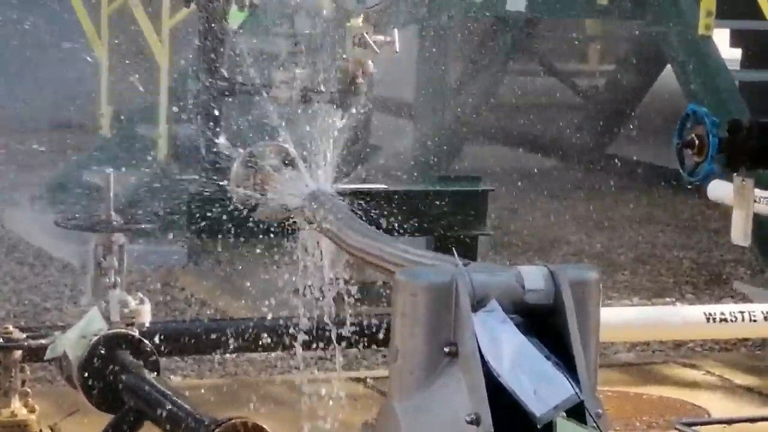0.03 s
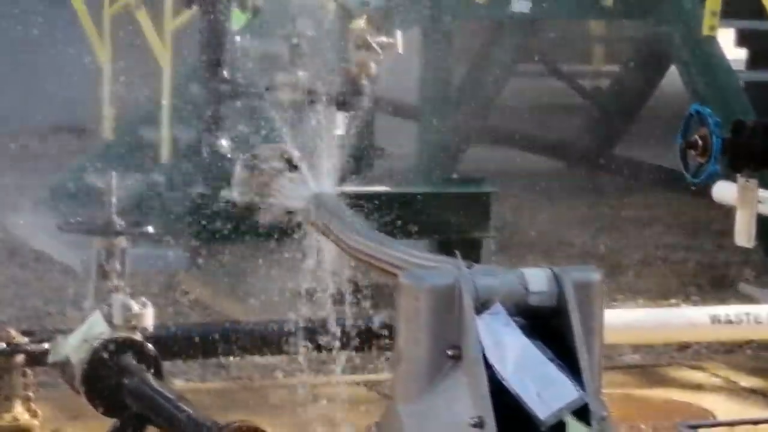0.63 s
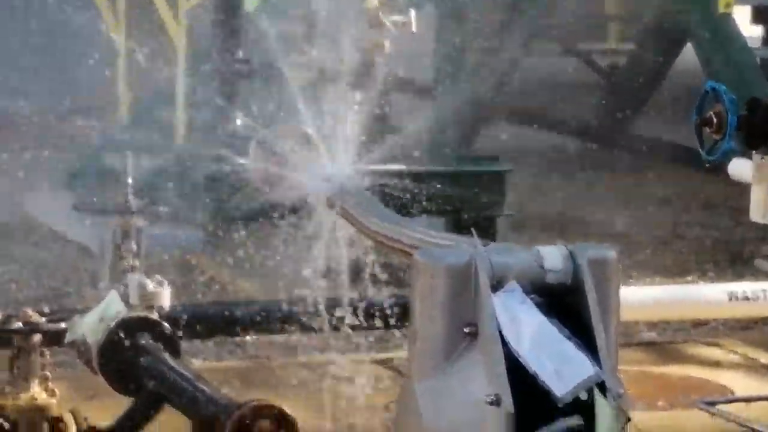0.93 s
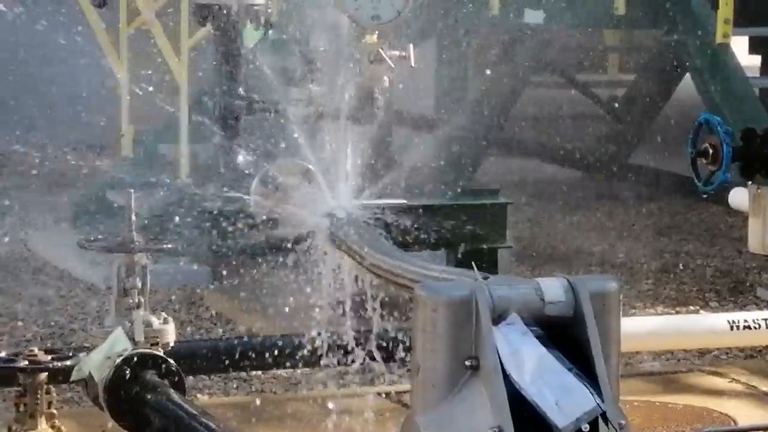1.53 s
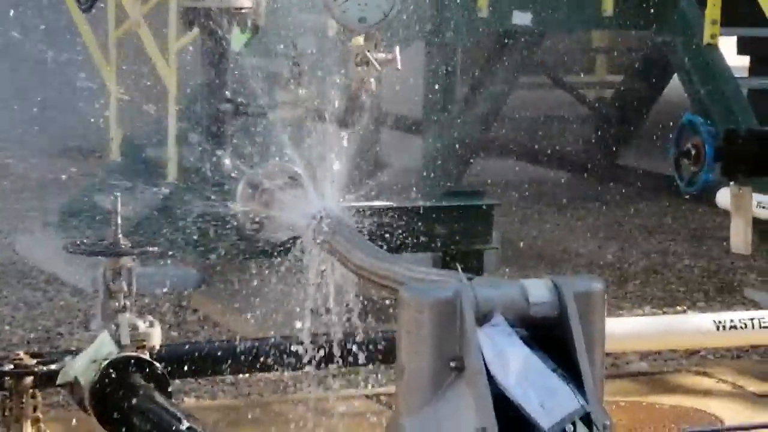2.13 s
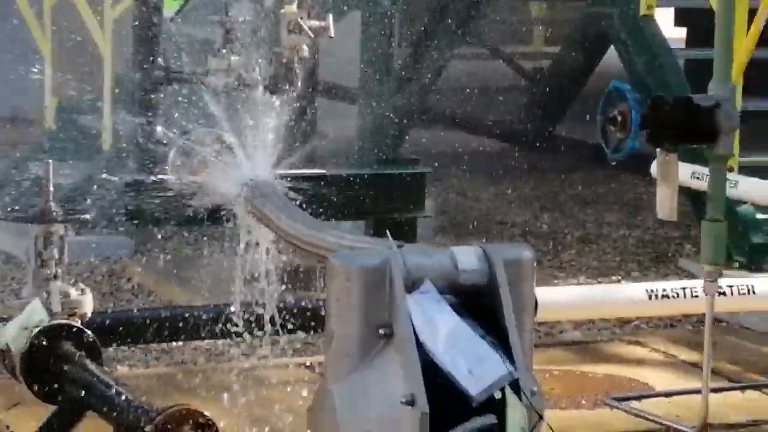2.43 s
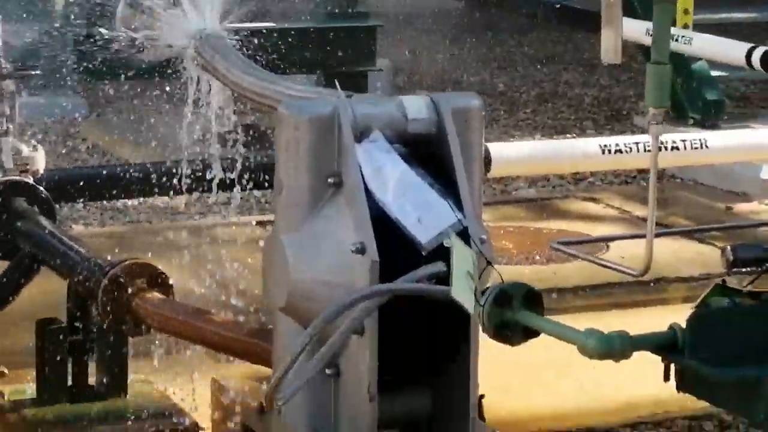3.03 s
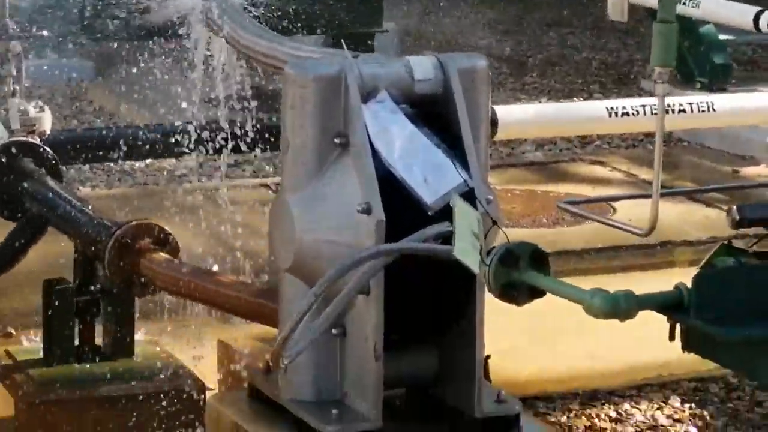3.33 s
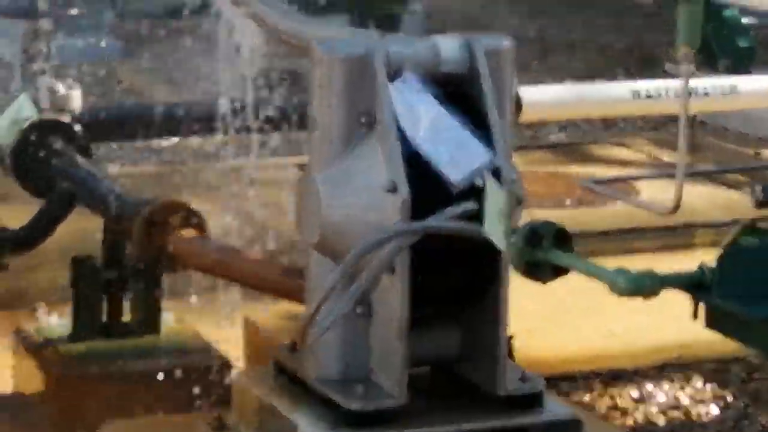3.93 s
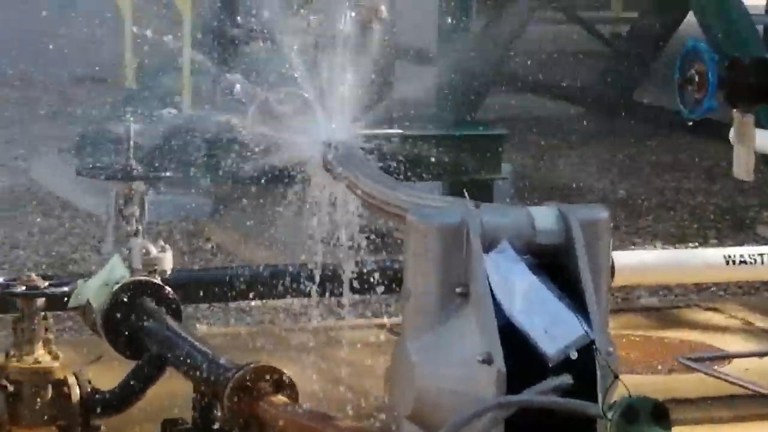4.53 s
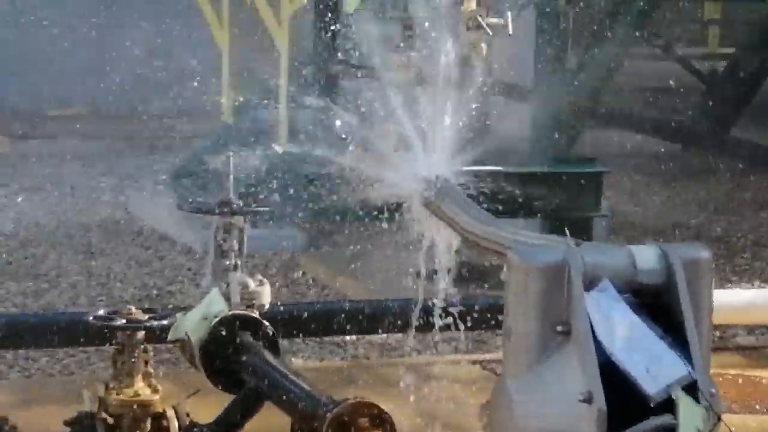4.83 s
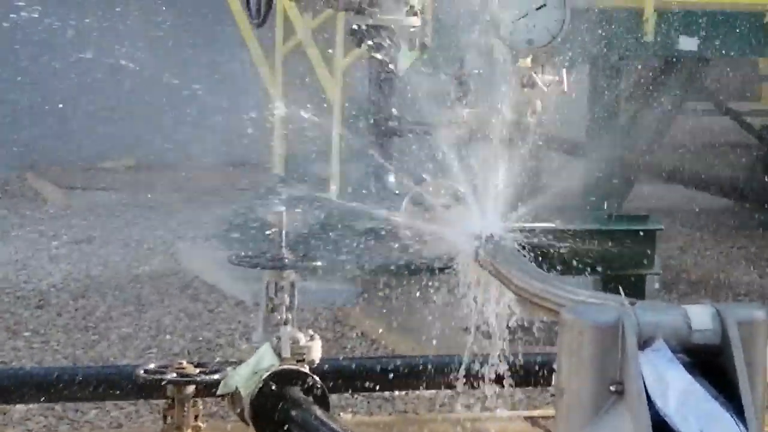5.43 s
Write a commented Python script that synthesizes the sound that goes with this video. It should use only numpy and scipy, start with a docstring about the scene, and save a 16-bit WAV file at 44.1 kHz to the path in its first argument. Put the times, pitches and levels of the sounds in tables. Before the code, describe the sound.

Water sprays and splutters from a leaking hose in time with rhythmic metallic pump clacks, under a piercing, wavering whine and wind rumble.

```python
"""A pump at an outdoor plant forces water out of a split hose, one stroke about every 0.58 s.
Each stroke clacks against the ringing pump head and drives a gush, then a splutter of bubbles, into the
steady spray. The motor drive whines at a pitch and its octave, rising and sagging with the load.
Drops splat on the machinery, wind buffets the right port of a hand-held microphone,
and other machines drone in the distance."""
import sys
import numpy as np
from scipy import signal
from scipy.fft import rfft, irfft
from scipy.io import wavfile

SR = 44100
rng = np.random.default_rng(int(sys.argv[2]) if len(sys.argv) > 2 else 0)


def master_out(mix):
    """Clip the mix to full scale and print it as 16-bit PCM to the path in sys.argv[1]."""
    frames = np.transpose(np.atleast_2d(mix))
    ceiling = np.clip(frames, -1, 1)
    pcm = np.round(ceiling * 32767).astype(np.int16)
    wavfile.write(sys.argv[1], SR, pcm)


N = 245637
TIME = np.arange(N) / SR


def undb(db):
    """Decibels to gain."""
    return 10 ** (np.asarray(db) / 20)


def unit(x):
    """Scale to rms 1."""
    return x / np.sqrt(np.mean(x ** 2))


def ramp(x):
    """Smooth step from 0 to 1."""
    return np.sin(np.pi / 2 * np.clip(x, 0, 1)) ** 2


def curves(table):
    """Automation lanes: each column of a table, joined by straight lines in time."""
    times, *columns = np.transpose(table)
    return [np.interp(TIME, times, column) for column in columns]


def response(hz, eq, column=1):
    """Gain of an EQ table at the given frequencies."""
    eq = np.asarray(eq, float)
    return undb(np.interp(np.log(hz + 1e-3), np.log(eq[:, 0]), eq[:, column]))


def colour(x, eq, column=1):
    """Filter by an EQ table."""
    return irfft(rfft(x) * response(np.fft.rfftfreq(N, 1 / SR), eq, column), N)


def walk(rate_hz):
    """Smooth random modulation with rms 1."""
    hz = np.fft.rfftfreq(N, 1 / SR)
    return unit(irfft(rfft(rng.standard_normal(N)) * np.exp(-(hz / rate_hz) ** 2), N))


def sides(pan_db):
    """Left and right gains with mean power 1; pan is left minus right."""
    gains = undb(np.array([pan_db, -pan_db]) / 2).reshape(2, -1)
    return gains / np.sqrt(np.mean(gains ** 2, axis=0))


def add(out, start_s, x):
    """Mix in a one-shot."""
    i = int(start_s * SR)
    x = x[..., max(-i, 0):N - i]
    out[..., max(i, 0):max(i, 0) + x.shape[-1]] += x


def ring(hz, t60, t, q=9):
    """A rough, damped resonance: narrow noise that dies away, unrelated left and right."""
    b, a = signal.iirpeak(hz, q, fs=SR)
    noise = signal.lfilter(b, a, rng.standard_normal((2, 2 * len(t))))[:, len(t):]
    return unit(noise) * np.exp(-np.log(1000) * t / t60)


def impacts(per_s, spread_db):
    """A stereo hail of tiny clicks at random times."""
    hit = rng.random((2, N)) < per_s / SR
    size = undb(spread_db * np.minimum(rng.exponential(size=(2, N)), 5))
    return unit(hit * size * rng.choice([-1, 1], (2, N)))


# EQ of the distant drone: (frequency [Hz], gain [dB])
DRONE_EQ = [(20, -17), (40, 10.5), (120, 1), (250, -9), (500, -20), (800, -11), (1200, -57), (3000, -41)]


def plant(level_db=-48):
    """The background bed: other machinery drones in the distance."""
    return unit(colour(rng.standard_normal((2, N)), DRONE_EQ)) * undb(level_db + walk(7.4))


# breeze between gusts: (time [s], level [dB])
BREEZE = [(0, -50.5), (.2, -54), (.36, -58), (.9, -48), (1.6, -44), (2.3, -44.5), (3.2, -39), (4.0, -40.5),
          (4.45, -47.5), (5.0, -42), (5.57, -42)]
# gusts that catch the port: (start [s], length [s], rumble level [dB], flutter level [dB])
PORT_GUSTS = [(0.543, 0.051, -40.5, -42), (0.742, 0.1, -38.5, -53.5), (0.881, 0.03, -35, -45.5),
              (0.961, 0.2, -37.5, -45.5), (1.113, 0.034, -41, -31), (1.211, 0.15, -34, -34),
              (1.45, 0.17, -37.5, -51.5), (1.662, 0.12, -35, -40.5), (1.819, 0.12, -35.5, -38.5),
              (1.984, .12, -38, -39), (2.466, 0.029, -41.5, -39.5), (2.572, .2, -37.5, -42),
              (2.778, 0.237, -38, -40.5), (3.354, 0.25, -34, -41.5), (3.743, 0.264, -35, -39),
              (4.052, 0.1, -37, -34.5), (4.16, .08, -39, -43.5), (4.562, 0.129, -30.5, -31),
              (4.743, 0.12, -32.5, -37), (4.905, 0.26, -32, -36.5), (5.201, 0.14, -33, -37.5)]
# EQ of the low rumble: (frequency [Hz], gain [dB])
RUMBLE_EQ = [(15, -12), (30, -4.5), (60, -0.5), (130, -1.5), (220, -6.5), (350, -18.5), (700, -51)]
# EQ of the papery flutter: (frequency [Hz], gain [dB])
FLUTTER_EQ = [(100, -47.5), (250, -2), (380, -1.5), (550, -8), (750, -14), (1050, -31.5), (1800, -46),
              (4000, -75)]
# thumps of the heaviest eddies: (time [s], level [dB])
THUMPS = [(1.244, -13.5), (1.285, -18), (1.377, -14.5), (1.766, -19), (1.825, -16), (1.908, -16),
          (2.028, -20), (2.072, -19.5), (2.472, -21), (2.809, -15.5), (2.98, -15), (3.39, -16.5),
          (3.801, -13.5), (3.942, -9.5), (4.094, -10.5), (4.127, -9), (4.181, -20), (4.244, -20),
          (4.623, -18), (4.746, -11), (4.798, -7.5), (4.997, -10.5), (5.205, -11)]


def wind(rumble_gain_db=9, flutter_gain_db=6.5, thump_gain_db=3, thump_hz=221, edge_s=.0078, ceiling=.5):
    """Eddies roll over the right microphone port in bursts; the left port lies in the lee."""
    breeze_db, = curves(BREEZE)
    rumble_env, flutter_env = undb(breeze_db), undb(breeze_db - 14)
    for start, length, rumble_db, flutter_db in PORT_GUSTS:
        gate = ramp((TIME - start) / edge_s + .5) * ramp((start + length - TIME) / edge_s + .5)
        rumble_env = np.maximum(rumble_env, gate * undb(rumble_db))
        flutter_env = np.maximum(flutter_env, gate * undb(flutter_db))
    rumble, flutter = np.zeros((2, N)), np.zeros((2, N))
    pops = impacts(per_s=330, spread_db=2.5)  # small eddies strike one by one
    for port in (0, 1):
        eddies = walk(54)
        rumble[port] = unit(colour(rng.standard_normal(N), RUMBLE_EQ) * undb(3.2 * eddies))
        flutter[port] = unit(colour(pops[port], FLUTTER_EQ) * undb(6.4 * np.tanh(1.4 * eddies)))
    out = rumble * rumble_env * undb(rumble_gain_db) * undb([[-13], [0]])
    out += flutter * flutter_env * undb(flutter_gain_db) * undb([[-17], [0]])
    passage = np.sqrt(12) * thump_hz * (TIME[:SR // 30] - .003)
    thump = (1 - passage ** 2) / (1 + passage ** 2) ** 2  # a pressure bump between two shallow dips
    for start, db in THUMPS:
        add(out[1], start, thump * undb(db + thump_gain_db))
    return ceiling * np.tanh(out / ceiling)  # the narrow port throttles the strongest swirls


# EQ of the spray: (frequency [Hz], left gain [dB], right gain [dB])
SPRAY_EQ = [(283, 2, -10), (830, -5.5, -9.5), (1350, -10.5, -13.5), (1570, -10, -22.5), (2030, -7, -10.5),
            (3660, -11, -18.5), (4210, -8, -19), (5420, 1.5, -25), (6910, 1.5, -2), (7830, -49, -15),
            (8470, -18, -19), (9910, -23, -6.5), (11250, -24, -20.5), (15000, -12, -10.5)]
# fader ride of the spray: (time [s], level [dB])
SPRAY_RIDE = [(0, -51.5), (.5, -47.5), (1.35, -53), (1.8, -49), (2.6, -51), (3.35, -48), (4.05, -52.5),
              (4.8, -49.5), (5.57, -51)]


def spray(gain_db=5, patter_mix=.65):
    """Fine mist hisses from the split while drops patter down."""
    flow_db, = curves(SPRAY_RIDE)
    left, right = rng.standard_normal((2, N)) + patter_mix * impacts(per_s=900, spread_db=-3.5)
    hiss = np.array([colour(left, SPRAY_EQ, column=1), colour(right, SPRAY_EQ, column=2)])
    return unit(hiss) * undb(flow_db + gain_db + 1.35 * walk(27))


# the largest splats on the machinery: (time [s], level [dB], pitch [Hz])
BIG_SPLATS = [(0.176, -40, 5460), (.341, -37, 5300), (0.765, -41, 5500), (.854, -36.5, 5850),
              (0.9428, -40, 5770), (1.6885, -34.5, 6060), (1.8903, -32, 5800), (3.3074, -36, 5350),
              (4.057, -36, 6100), (4.4095, -36.5, 5450), (4.7673, -34, 5670), (5.448, -40, 5200)]


def splats(t60=.057, body_hz=2400, small_count=14):
    """Slugs of water slap the pipes and housing on the left, with smaller ones at random."""
    out, t = np.zeros((2, N)), TIME[:SR // 8]
    small_splats = [(TIME[-1] * when, -44 + 5 * (size - .5), 5250 + 900 * (pitch - .5))
                    for when, size, pitch in rng.random((small_count, 3))]
    for start, db, hz in BIG_SPLATS + small_splats:
        slap = ring(hz, t60, t) + undb(-15) * ring(body_hz, t60, t)
        add(out, start, slap * undb(db) * sides(pan_db=12))
    return out


# bright spits of fine drops: (time [s], level [dB])
FINE_SPITS = [(1.0291, -41), (1.0655, -37), (2.1894, -41), (2.585, -42), (4.5181, -35.5), (4.9666, -37.5)]


def spits(gain_db=-5, hz=10000, t60=.14):
    """Fine drops spit close by on the right."""
    out, t = np.zeros((2, N)), TIME[:SR // 8]
    for start, db in FINE_SPITS:
        add(out, start, ring(hz, t60, t) * undb(db + gain_db) * sides(pan_db=-12))
    return out


# cue list of pump strokes, played by splutter, gush, motor and pump:
# (time [s], clack level [dB], clack pan [dB], gush level [dB], splutter level [dB],
#  time until the load returns [s], free pitch [Hz], loaded pitch [Hz], end pitch [Hz],
#  free whine level [dB], loaded whine level [dB], loaded octave level [dB], squeal boost [dB])
STROKE_CUES = [(-.17, -28, 10, -44, -50, 0.29, 6910, 6660, 6410, -37, -43, -49, 5),
               (0.41, -25.5, 15, -50, -48.5, 0.3, 7110, 6520, 6200, -41, -43, -50.5, 16),
               (.994, -26, 14, -49, -42.5, 0.33, 7020, 6580, 6390, -40.5, -42.5, -47, -3),
               (1.579, -26.5, 5, -51, -47, 0.29, 7100, 6530, 6340, -39, -41.5, -49.5, 16),
               (2.1559, -28, 10, -50.5, -45, 0.29, 7070, 6530, 6370, -40, -40.5, -46.5, 0),
               (2.7485, -26.5, 9, -51.5, -45.5, 0.25, 6970, 6630, 6530, -39, -41.5, -46.5, -2.5),
               (3.3275, -28.5, 11, -48.5, -49.5, 0.31, 7090, 6700, 6610, -43.5, -40, -46, 10),
               (3.899, -28.5, 7, -49.5, -50.5, 0.28, 7150, 6470, 6091, -43, -41, -47, 9),
               (4.4834, -27.5, 43, -47.5, -48, 0.32, 6970, 6590, 6320, -41, -41.5, -46.5, -1),
               (5.064, -25, -3, -44.5, -50, 0.25, 6900, 6690, 6680, -44, -44, -45, -2)]


def splutter(delay_s=.168, scatter_s=.032, centre_hz=1080, spread_octaves=.558, decay_cycles=3, count=70):
    """Shortly after each stroke, air reaches the split: a loose cloud of small bursting bubbles."""
    out, t = np.zeros((2, N)), TIME[:SR // 40]
    for start, _, _, _, db, *_ in STROKE_CUES:
        for late, pitch, size, pan in rng.standard_normal((count, 4)):
            cycles = centre_hz * 2 ** (spread_octaves * pitch) * t
            bubble = np.sin(2 * np.pi * cycles) * np.exp(-cycles / decay_cycles)
            add(out, start + delay_s + scatter_s * late, bubble * undb(db + 1.44 * size) * sides(12 * pan))
    return out


def gush(decay_s=.097, gain_db=8):
    """Water bursts out with each stroke and dies back."""
    push, t = np.zeros(N), TIME[:SR // 2]
    for start, _, _, db, *_ in STROKE_CUES:
        add(push, start, undb(db + gain_db) * np.exp(-t / decay_s))
    return rushing_water() * push * undb(2 * walk(22))


# EQ of the gushing water: (frequency [Hz], gain [dB])
GUSH_EQ = [(400, 7), (900, -0.5), (1300, 8.5), (1650, 3), (2250, 9), (3000, 7), (3800, 2), (5400, 5.5),
           (7000, 9), (8500, -1.5), (10000, -4.5), (15000, -55)]


def rushing_water():
    """Dense droplets merge into the grainy rush of a gush."""
    return unit(colour(impacts(per_s=5000, spread_db=0), GUSH_EQ))


RIPPLE_HZ = 144.45  # cycle rate of the motor drive: the spacing of the whine's harmonics


def switching_tone(cycles, centre_hz, casing_eq, width_hz, skirt, shelf_db, waver_db, jitter_rad,
                   lock_db=0, squeal_db=0, squeal_hz=0):
    """The drive's switching repeats each ripple cycle: a comb of harmonics, loudest near a moving pitch."""
    lowest = int((centre_hz.min() - 400) / RIPPLE_HZ)
    highest = int((centre_hz.max() + 900) / RIPPLE_HZ)
    out, power = np.zeros((2, N)), 0
    knots = np.linspace(0, TIME[-1], 55)
    jitter = jitter_rad * walk(170)  # no two cycles switch quite alike
    for k in range(lowest, highest + 1):
        hz = k * RIPPLE_HZ
        detune = (hz - centre_hz) / width_hz
        shape = (1 + detune ** 2) ** -skirt + undb(shelf_db) * np.clip(detune, 0, 1)
        boost_db = lock_db * np.exp(-((hz - centre_hz) / 56) ** 2)  # the nearest harmonic sings out
        boost_db += squeal_db * np.exp(-((hz - squeal_hz) / 100) ** 2)
        # reflections reach each port with their own strength and phase, and shift as the hand moves
        waver = undb(waver_db * rng.standard_normal((2, len(knots))))
        offset = 2 * np.pi * rng.random((2, 1))
        drift = offset + .35 * np.cumsum(rng.standard_normal((2, len(knots))), axis=1)
        gain = response(hz, casing_eq) * shape * undb(boost_db)
        gain = gain * np.array([np.interp(TIME, knots, side) for side in waver])
        phase = 2 * np.pi * (k * cycles % 1) + jitter
        phase = phase + np.array([np.interp(TIME, knots, side) for side in drift])
        out += gain * np.sin(phase)
        power = power + gain ** 2
    return out / np.sqrt(power)


# how well the motor casing radiates the whine: (frequency [Hz], gain [dB])
CASING_EQ = [(5600, -1), (5780, 1), (5925, 10), (6070, -4), (6215, -15), (6360, 6.5), (6503, 1.5),
             (6650, 7.5), (6795, 7.5), (6940, 0), (7090, 8.5), (7500, -0.5), (8000, 0.5)]
# how well it radiates the octave: (frequency [Hz], gain [dB])
CASING_OCTAVE_EQ = [(11700, 9), (12570, -9), (12720, 11), (12865, -2), (13005, 8), (13150, 2.5), (13295, 2),
                    (13440, 0), (13750, -7), (14180, 2), (14320, 4), (14465, -8), (14610, 0), (15200, -3)]
# pan ride as the microphone turns: (time [s], whine pan [dB], octave pan [dB])
WHINE_PAN = [(0, 14.5, 3), (1.5, 12.5, -5), (2.6, 18.5, -3.5), (4.3, 12, -7.5), (4.8, 7, -10),
             (5.57, -2, -8)]


def motor(whine_gain_db=5, octave_gain_db=3, start_hz=6400, fall_s=.13, sag_end_s=.554):
    """Each stroke frees the motor: its whine climbs, holds, falls as the load returns, then sags."""
    cues = np.array(STROKE_CUES)
    stroke = np.searchsorted(cues[:, 0], TIME, side="right") - 1
    start, *_, free_s, free_hz, loaded_hz, end_hz, free_db, loaded_db, high_db, squeal_db = cues[stroke].T
    age = TIME - start
    rise_s = np.where(stroke % 2, .15, .07)  # the two sides of the pump take turns
    rise = np.sin(np.pi / 2 * np.clip(age / rise_s, 0, 1))
    load = ramp((age - free_s) / fall_s + .5)
    sag = np.clip((age - free_s) / (sag_end_s - free_s), 0, 1)
    free = rise * (1 - load)
    pitch_hz = start_hz + (free_hz - start_hz) * rise + (loaded_hz - free_hz) * load
    pitch_hz += (end_hz - loaded_hz) * sag + 26 * walk(20)

    # with the load off, the motor runs a touch faster and the whine is rougher and wider
    relief = (age / .11 * np.exp(1 - age / .11)) ** 2
    cycles = np.cumsum(RIPPLE_HZ + .42 * relief) / SR
    jitter_rad = .05 + .16 * relief
    breakup = np.sin(np.pi * load)  # as the load returns, the whine smears over many harmonics
    spread = 1 + .28 * relief + .58 * breakup
    whine = switching_tone(cycles, pitch_hz, CASING_EQ, width_hz=270 * spread, skirt=.88, shelf_db=-36,
                           waver_db=2.4, jitter_rad=jitter_rad,
                           lock_db=7.5 * (1 + load) / 2 * (1 - breakup),
                           squeal_db=squeal_db * np.sqrt(sag), squeal_hz=5925 + 120 * sag)
    octave_hz = 2 * pitch_hz + 300 * free  # sharp while running free
    octave = switching_tone(cycles, octave_hz, CASING_OCTAVE_EQ, width_hz=(560 + 160 * free) * spread,
                            skirt=1.8, shelf_db=-26, waver_db=4.2, jitter_rad=1.8 * jitter_rad)

    duck_db = 4 * np.sin(np.pi * free)  # both layers duck during the glides
    flicker_db = 1.1 * walk(75)
    whine_db = loaded_db + (free_db - loaded_db) * free - duck_db + whine_gain_db
    octave_db = high_db + (-45.5 - high_db) * free - duck_db + flicker_db + octave_gain_db
    whine_pan, octave_pan = curves(WHINE_PAN)
    whine *= undb(whine_db) * sides(whine_pan - 7.5 * free)
    octave *= undb(octave_db) * sides(octave_pan + 7 * free)
    return whine + octave


# ring of the pump head and pipe: (frequency [Hz], level [dB], decay by 60 dB [s])
HEAD_MODES = [(1257, -11, 0.14), (2220, -5, 0.1), (2260, -4, 0.025), (3100, -16, 0.043), (4580, -7, 0.013),
              (4390, -1.5, 0.044), (4760, 6.5, 0.025), (5480, 2.5, 0.089), (6150, 1, 0.011),
              (10200, -10, 0.029)]


def pump(body_db=-10, tail_db=-19, tail_t60=.39, crack_db=-1, crack_s=.00053):
    """Each stroke cracks against the pump head, which rings; the plant around it adds a short tail."""
    out, t = np.zeros((2, N)), TIME[:SR // 4]
    crack_band = signal.butter(2, [1500, 7000], "bandpass", fs=SR, output="sos")
    for start, db, pan_db, *_ in STROKE_CUES:
        body = sum(undb(mode_db) * (ring(hz, t60, t, q=21) + undb(tail_db) * ring(hz, tail_t60, t, q=21))
                   for hz, mode_db, t60 in HEAD_MODES)
        crack = unit(signal.sosfilt(crack_band, rng.standard_normal((2, len(t))))) * np.exp(-t / crack_s)
        clack = body * undb(body_db) + crack * undb(crack_db)
        add(out, start, clack * undb(db) * sides(pan_db))
    return out


def scene():
    """The mix: pump and leak over wind and distant machinery."""
    return motor() + pump() + gush() + splutter() + spray() + splats() + spits() + wind() + plant()


def record(dry, cutoff_hz=15250):
    """A steep low-pass takes the very top off the mix."""
    return signal.sosfilt(signal.ellip(10, .2, 80, cutoff_hz, fs=SR, output="sos"), dry)


dry = scene()
out = record(dry)
master_out(out)
```